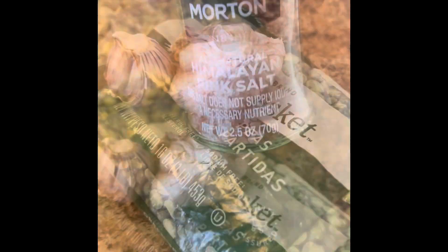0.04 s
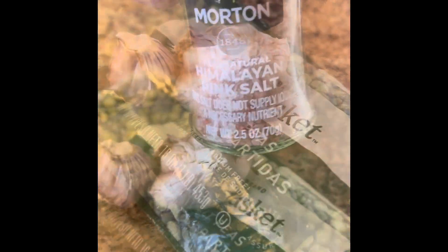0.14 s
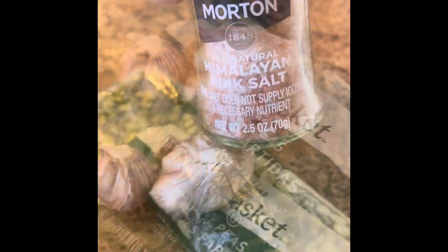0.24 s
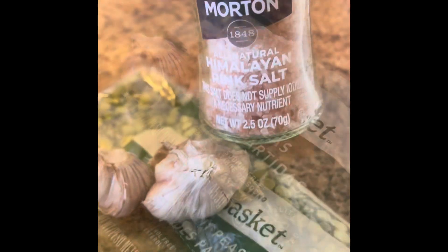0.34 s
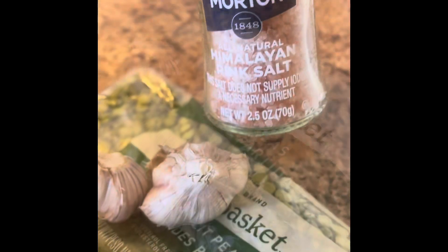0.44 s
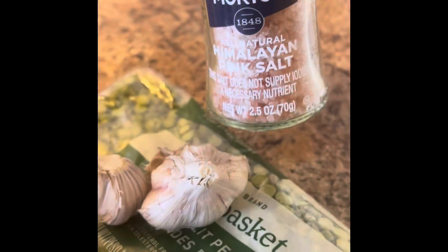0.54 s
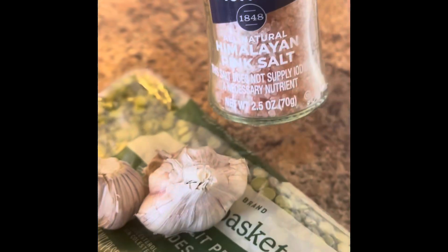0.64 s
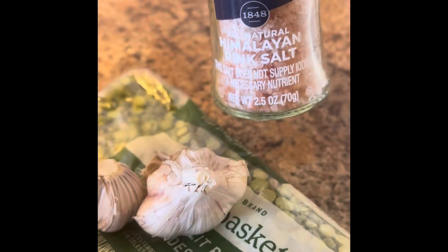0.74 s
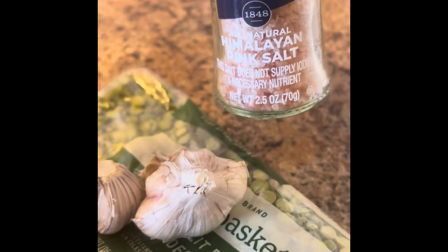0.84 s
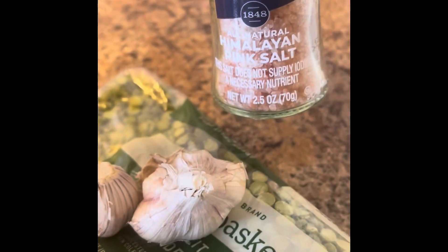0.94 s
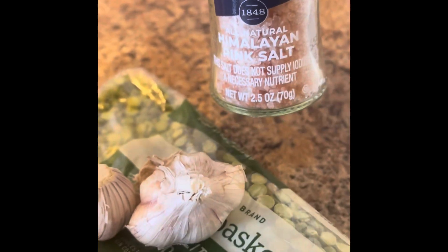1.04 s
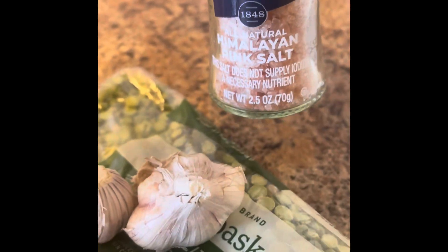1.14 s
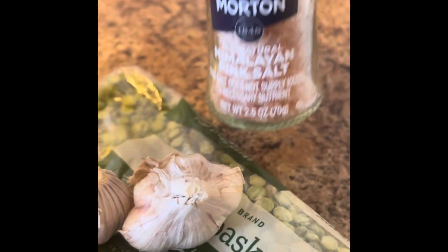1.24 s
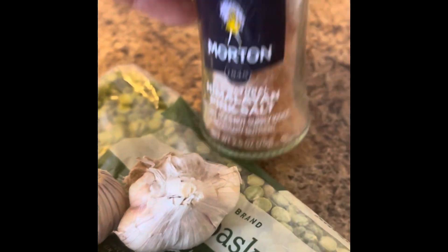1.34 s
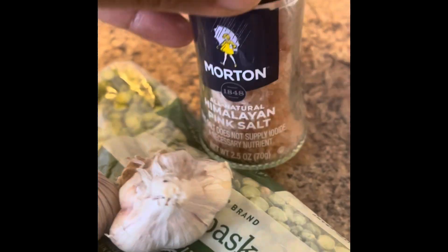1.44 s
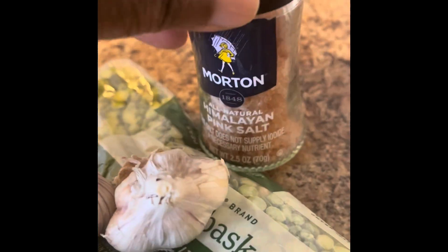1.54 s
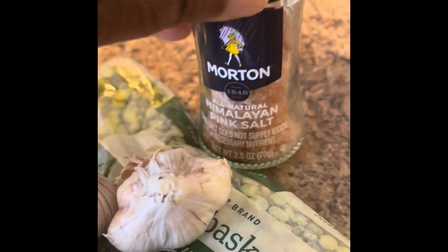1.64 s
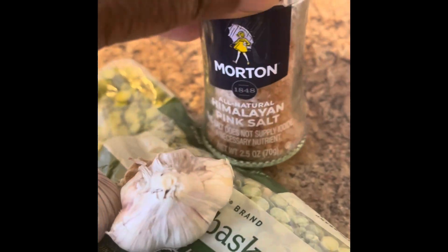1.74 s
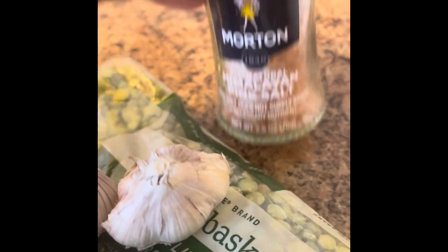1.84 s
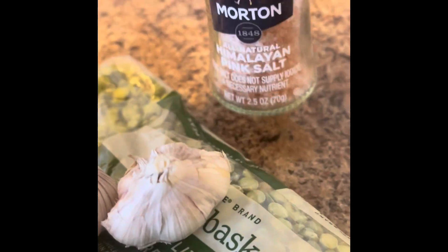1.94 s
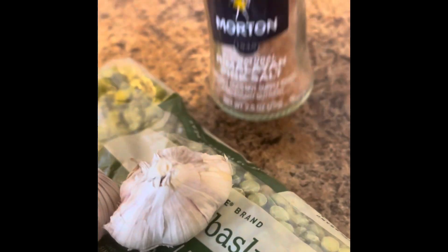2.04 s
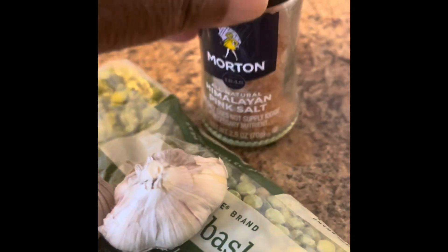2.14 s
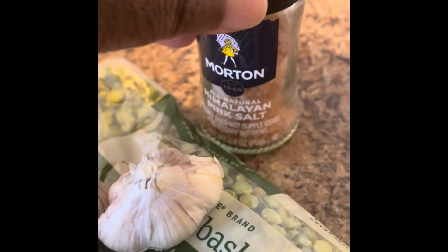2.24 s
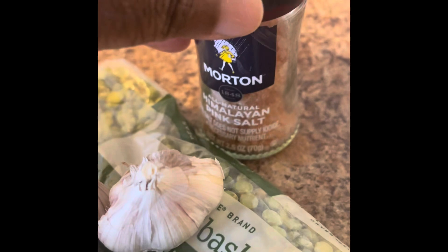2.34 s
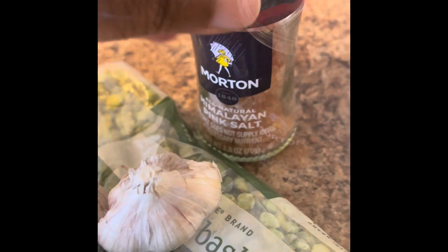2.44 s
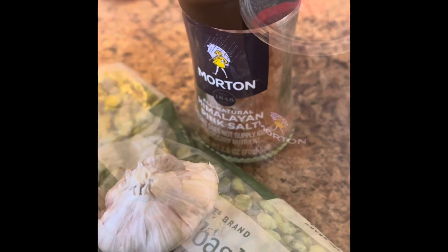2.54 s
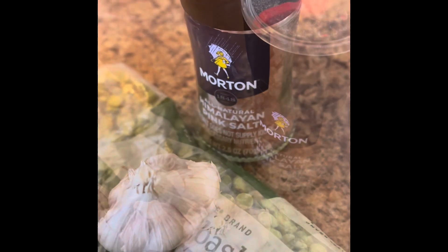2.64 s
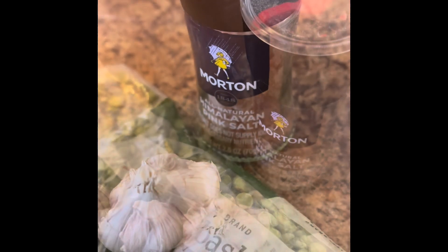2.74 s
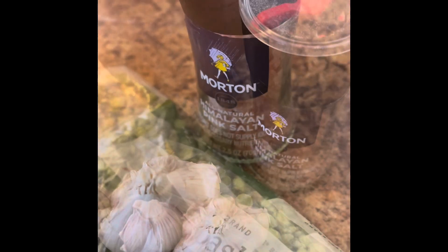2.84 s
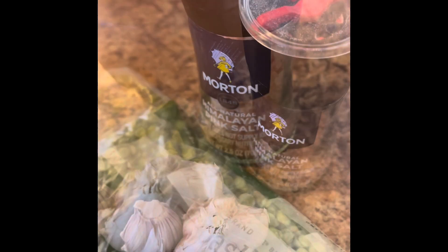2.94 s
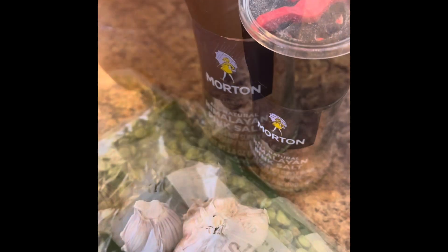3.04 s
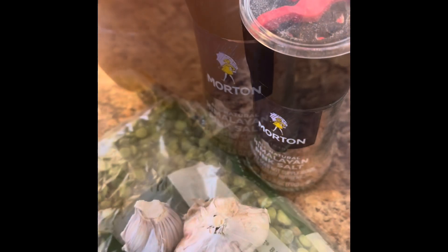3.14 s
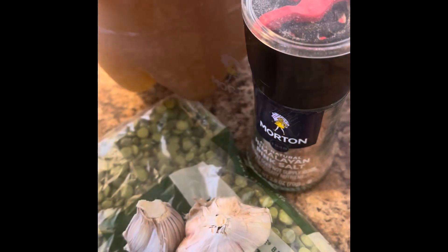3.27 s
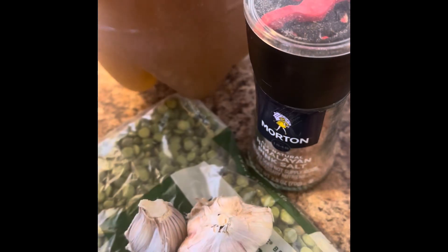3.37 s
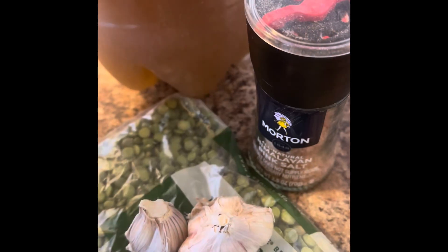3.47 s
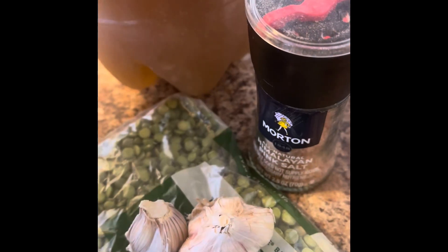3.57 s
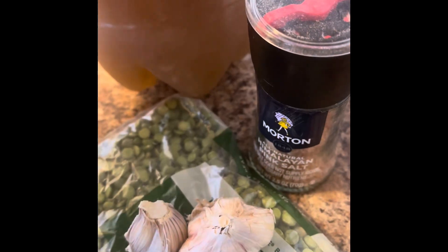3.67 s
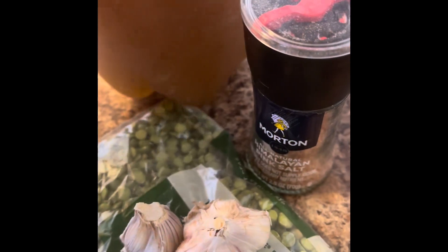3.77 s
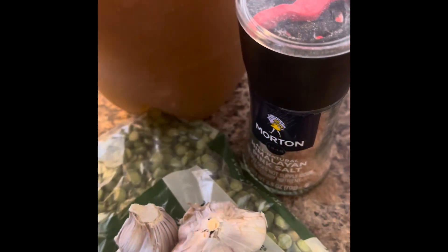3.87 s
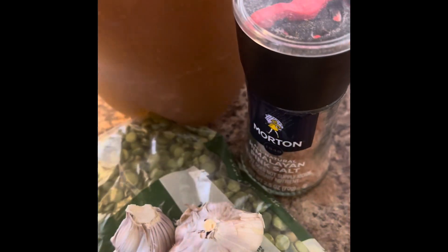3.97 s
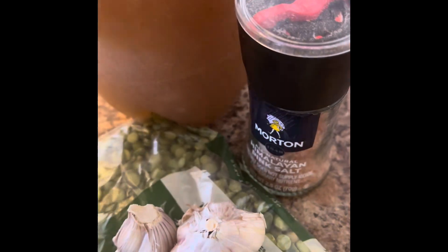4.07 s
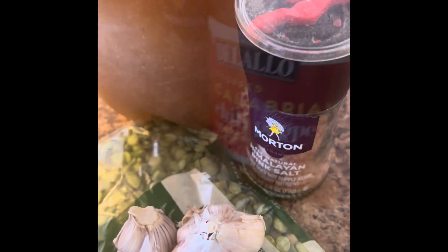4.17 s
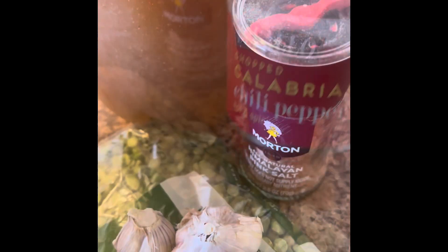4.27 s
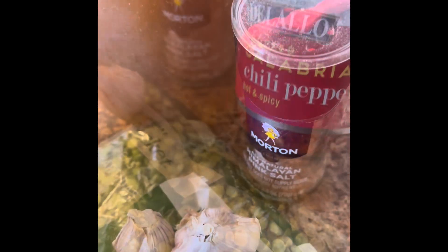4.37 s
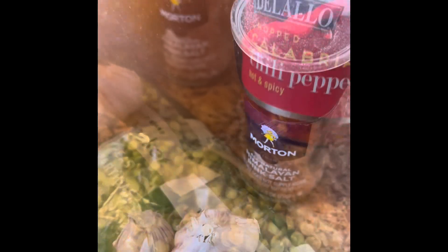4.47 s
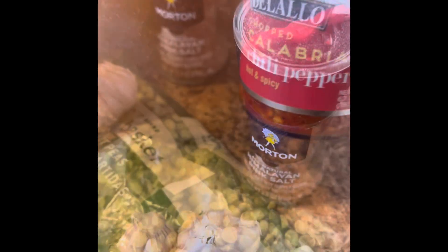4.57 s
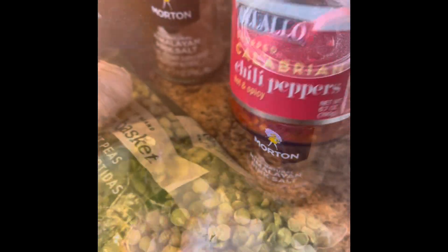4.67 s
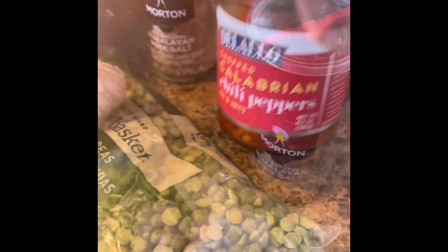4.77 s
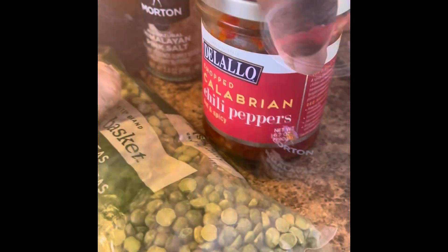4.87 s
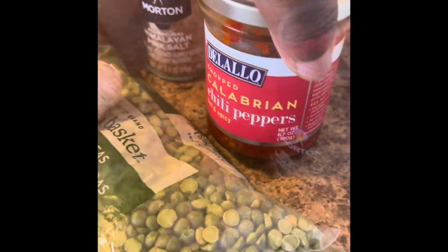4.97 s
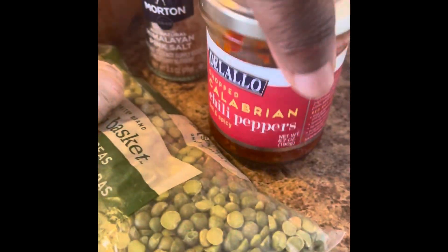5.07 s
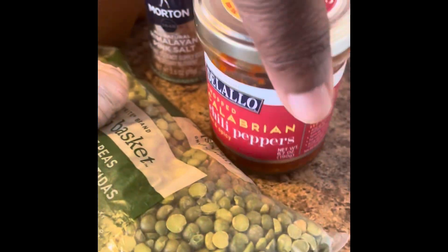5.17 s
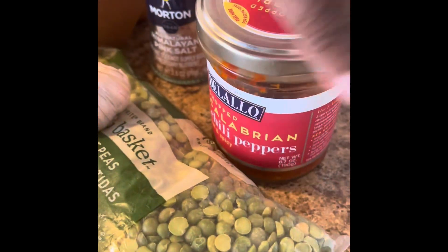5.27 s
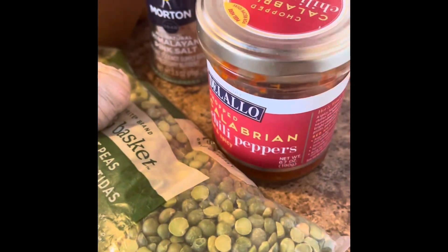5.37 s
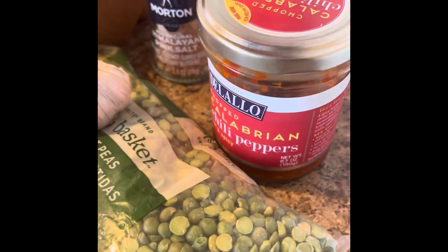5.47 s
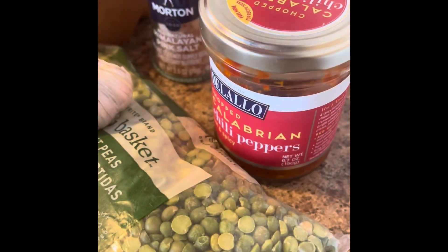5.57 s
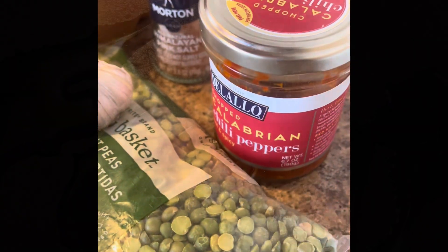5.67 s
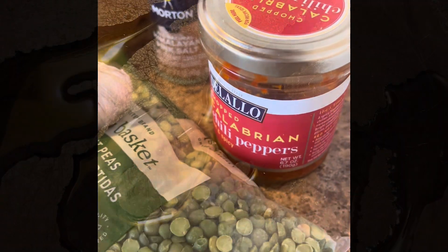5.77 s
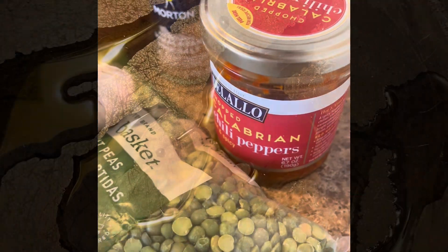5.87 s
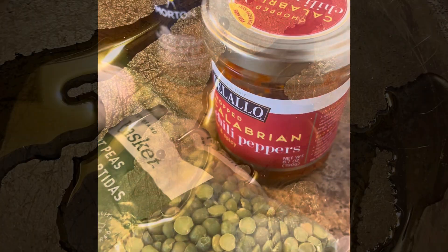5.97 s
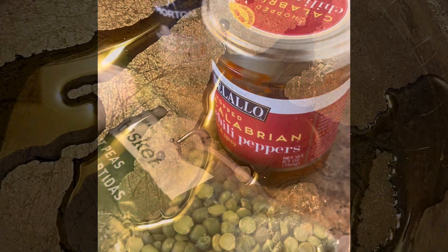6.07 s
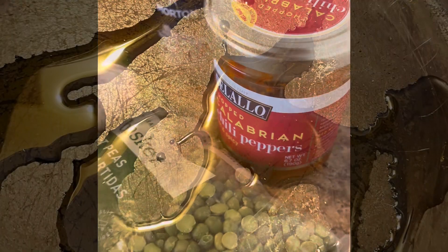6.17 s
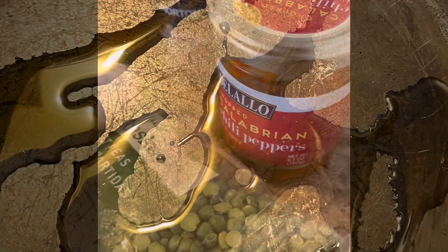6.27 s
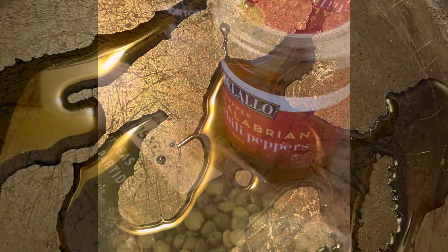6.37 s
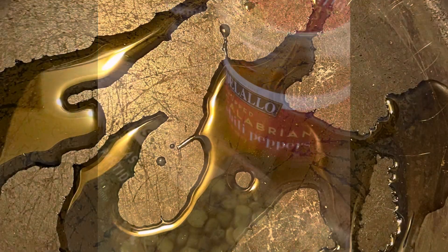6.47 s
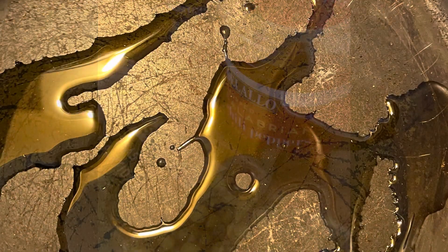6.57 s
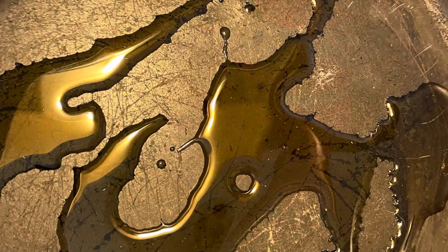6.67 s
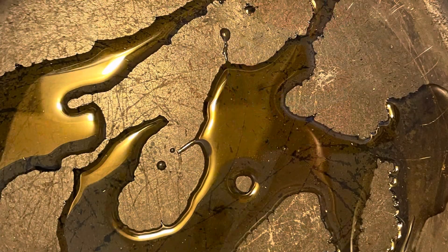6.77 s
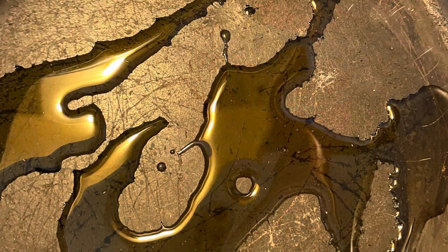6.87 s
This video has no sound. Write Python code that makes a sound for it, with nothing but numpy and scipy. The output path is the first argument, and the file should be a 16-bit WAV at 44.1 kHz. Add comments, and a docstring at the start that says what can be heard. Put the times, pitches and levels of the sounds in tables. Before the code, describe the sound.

Groceries are set down one at a time on a stone counter, close to the microphone, while a refrigerator hums low in the small kitchen. Light plastic crinkling leads to the hard clunk of a glass grinder. Faint packaging taps follow, then a full plastic bottle clacks and thuds with a burst of bag rustle. A glass jar knocks twice as it settles with a brief grating slide, and the hum fades away.

```python
"""Groceries on a stone countertop in a small kitchen, close to a stereo microphone, a refrigerator behind. A
bag of split peas crinkles as it is brushed. A glass salt grinder touches down rim first and lands flat at 2.1
s, ringing on the slab, and its cap taps lightly. At 3.7 s a full plastic bottle thumps down and brushes the
bag. At 4.9 s a glass jar lands, then rocks flat with a brief grating slide. The refrigerator's hum, there from
the start, fades out at the end."""
import sys
import numpy as np
from scipy import signal
from scipy.fft import rfft, irfft, next_fast_len
from scipy.io import wavfile
from scipy.ndimage import map_coordinates

SR = 44100
rng = np.random.default_rng(int(sys.argv[2]) if len(sys.argv) > 2 else 0)


def log_audio(samples):
    """Write samples as a 16-bit WAV file to the path given in sys.argv[1]."""
    # one column per channel
    frames = np.atleast_2d(samples).T
    # limit to full scale, then quantise
    limited = np.clip(frames, -1, 1)
    pcm = np.round(limited * 32767).astype(np.int16)
    wavfile.write(sys.argv[1], SR, pcm)


N = 304510

# the dense high modes of glass and of plastic on stone: (frequency [Hz], spectral level [dB])
GLASS_CLATTER = [(150, -39.5), (500, 7), (900, 3.5), (1500, -3), (2500, -11.5), (4000, -17), (7000, -30),
                 (11000, -24), (13000, -45), (16000, -62)]
PLASTIC_CLATTER = [(200, -25), (800, -0.5), (1800, 2.5), (4000, -1), (6500, -6.5), (8000, -23),
                   (11000, -22), (12500, -38.5), (16000, -60)]


def salt_grinder():
    """The glass grinder meets the stone rim first, then flat, and rings at each contact."""
    # contacts: (time [s], level [dB], brightness [Hz], clatter [dB])
    hits = [(1.6505, -24, 280, -21), (2.0722, .5, 10000, 0), (2.0787, -4, 200, -10)]
    # its ring on the slab: (frequency [Hz], level [dB], t60 [s])
    modes = [(98, -8.6, .13), (141, -13, .12), (204, -5, .125), (309, -27, .1), (425, -3.4, .08),
             (585, -22, .16), (655, -1.5, .06), (806, -16, .14), (975, -19, .07), (1100, -24, .07),
             (1353, -6, .03), (1522, -15, .052), (2265, -28, .05), (2473, -14, .011), (3383, -16, .008)]
    return knocks(hits, modes, GLASS_CLATTER, clatter_db=-18, clatter_t60=0.1, crack_db=-5,
                  lag=0.026, rise_cycles=0.37, skew_rad=0.54)


def glass_jar():
    """The jar lands with a double knock and rocks flat with another."""
    # contacts: (time [s], level [dB], brightness [Hz], clatter [dB])
    hits = [(4.8592, -1, 12000, 5.5), (4.8678, -2.5, 450, -9.5), (5.1206, -8.5, 3000, -20),
            (5.1251, -2.5, 2500, -6)]
    # its ring on the slab: (frequency [Hz], level [dB], t60 [s])
    modes = [(143.2, -20, 0.19), (200.3, -23, 0.12), (282, -30, 0.52), (378.5, -11.5, 0.12),
             (485.5, 0.06, 0.032), (548.7, -6, 0.04), (625, -10, 0.065), (756, -31.5, 0.1),
             (843, -16, 0.069), (1034, -26.5, 0.079), (1193, -29, 0.11), (1667, -11.5, 0.0054),
             (2020, -20.5, 0.011)]
    return knocks(hits, modes, GLASS_CLATTER, clatter_db=-22, clatter_t60=0.076, crack_db=-19,
                  lag=0.028, rise_cycles=0.65, skew_rad=0.2)


def plastic_bottle():
    """The full bottle's hard base clacks on the stone in four quick contacts."""
    # contacts: (time [s], level [dB], brightness [Hz], clatter [dB])
    hits = [(3.6860, -9, 2950, -5.5), (3.7030, -19, 2014, -2.5), (3.7120, -0.5, 7946, 2),
            (3.8098, 1.5, 1100, -23)]
    # its ring on the slab: (frequency [Hz], level [dB], t60 [s])
    modes = [(625.5, -15.5, .04), (836, -12.5, 0.034), (1036, -9, .035), (1192, -17.5, 0.099),
             (1330, -13, 0.045), (1904, -12.5, 0.055), (2040, -15.5, 0.017), (2620, -26, 0.049),
             (3339, -25, 0.065), (3813, -18.5, 0.017), (4100, -18.5, 0.047), (6073, -24.5, .05)]
    return knocks(hits, modes, PLASTIC_CLATTER, clatter_db=-10.5, clatter_t60=.05, crack_db=-13.5,
                  lag=0.024, rise_cycles=1.0, skew_rad=0.93)


def knocks(hits, modes, clatter, clatter_db, clatter_t60, crack_db, lag, rise_cycles, skew_rad):
    """Each contact gives a crack, a short clatter and the object's modes; soft contacts ring duller."""
    out, t = np.zeros((2, N)), np.arange(SR // 2) / SR
    for s, db, bright_hz, rattle_db in hits:
        ring = np.zeros((2, len(t)))
        for k, (hz, mode_db, t60) in enumerate(modes):
            age = np.maximum(t - lag / np.sqrt(hz), 0)  # low bending waves cross the slab more slowly
            swell = 1 - np.exp(-age * hz / rise_cycles)
            decay = amp(mode_db + rng.normal(0, .5) - 60 * age / t60)
            # short waves reach the microphone's two ports out of step
            skew = skew_rad * min(hz / 700, 1, 2500 / hz) * (-1) ** k * np.array([[1], [-1]])
            ring += decay * swell * np.sin(2 * np.pi * hz * age + skew)
        burst = amp(clatter_db - 60 * t / clatter_t60) + amp(crack_db - 60 * t / .006)
        grit = amp(rattle_db) * coloured(burst * near_noise(len(t), width=.2), clatter)
        contact_lowpass = signal.butter(1, np.clip(bright_hz, 50, SR / 3), fs=SR)
        add(out, s, amp(db) * (signal.lfilter(*contact_lowpass, ring) + grit))
    return out


def counter_thuds(rumble_db=-9, focus_db=18, rise_cycles=0.38):
    """Weight settling on the counter swings the modes near its own pace, in a dull rumble."""
    # soft heavy contacts: (time [s], level [dB], favoured frequency [Hz], left over right [dB])
    pushes = [(1.475, -29, 144, 1), (1.653, -27.5, 267, -0.5), (2.081, -14, 130, -5),
              (3.687, -18.5, 284, -8), (3.720, -14, 192, -9), (3.795, -14, 101, -8), (3.8128, -10, 145, -9),
              (3.915, -29.5, 88, -5.5), (4.146, -30.5, 135, -9), (4.863, -12, 172, -0.5)]
    # low modes of the loaded counter: (frequency [Hz], level [dB], t60 [s])
    modes = [(56, -9, .25), (82.4, -6.5, 0.12), (100, 1, 0.22), (137, -1, 0.2), (191, 0, 0.1),
             (275, -2.5, .08)]
    out, t = np.zeros((2, N)), np.arange(SR // 2) / SR
    for s, db, push_hz, pan_db in pushes:
        swing = np.zeros(len(t))
        for hz, mode_db, t60 in modes:
            start_db = db + mode_db - focus_db * np.log2(hz / push_hz) ** 2
            swell = 1 - np.exp(-t * hz / rise_cycles)
            swing += amp(start_db - 60 * t / t60) * swell * np.sin(2 * np.pi * hz * t)
        band = [(push_hz / 6, -45), (push_hz / 3, -25), (push_hz, 0),
                (1.7 * push_hz, -5), (4 * push_hz, -38), (15 * push_hz, -80)]
        rumble = coloured(amp(db + rumble_db - 60 * t / .15) * near_noise(len(t), width=0.13), band)
        add(out, s, (swing + rumble) * amp([[pan_db / 2], [-pan_db / 2]]))
    return out


def bag_snaps(gain_db=-3.5, snap_t60=0.0048, flutter_db=-10, flutter_t60=.04):
    """A crease of the plastic bag buckles with a sharp tick, and the film flutters briefly."""
    # the loudest creases: (time [s], level [dB], low crack [dB], top sparkle [dB])
    snaps = [(0.1072, -43, -17.5, -4.5), (0.2952, -41.5, -16.5, -7), (1.3139, -31.5, 2, -5),
             (1.3263, -29, 3, -1.5), (1.3763, -29, -18, -8.5), (1.4042, -31, -21, -18),
             (1.426, -38, -16, -35), (1.6901, -41.5, -20, -21), (1.806, -45, -6, -17),
             (2.2682, -41, 0, -14), (2.3725, -38.5, -23, -15), (2.9486, -27, -15.5, -17.5),
             (3.7758, -13, -12.5, -17), (3.7899, -14.5, -5, -15), (3.8296, -17.5, -16.5, -17),
             (3.904, -20, -11, -24.5), (3.9144, -22.5, -1.5, -26), (3.9598, -32.5, -28, -5),
             (3.9961, -37, -35, -15), (4.0652, -22.5, -27, -7), (4.125, -30.5, -6.5, -18.5),
             (4.2641, -36, -17, 0.5), (4.3156, -41, -24, -2), (5.7693, -46.5, -27, -3)]
    out, t = np.zeros((2, N)), np.arange(SR // 8) / SR
    decay = amp(-60 * t / snap_t60) + amp(flutter_db - 60 * t / flutter_t60)
    for s, db, low_db, top_db in snaps:
        tick = decay * near_noise(len(t), width=0.19)
        colour = [(400, low_db - 30), (1500, low_db), (3000, low_db - 0.5), (6500, -13),
                  (11000, top_db + 5.5), (13500, top_db - 10), (16000, top_db - 25)]
        add(out, s, amp(db + gain_db) * coloured(tick, colour))
    return out


def bag_rustle(press_s=.016, relax_s=.04, sag_db=6.5, arch_db=9.5, crease_db=-5):
    """A brush crumples the bag hardest at first, fizzes most halfway and pops creases at random."""
    # touches on the bag: (start [s], length [s], crumple [dB], fizz [dB])
    brushes = [(0.076, 0.34, -100, -68), (1.315, .165, -49, -56.5), (1.592, 0.119, -66.5, -73),
               (1.723, 0.061, -59, -60.5), (2.21, .21, -64.5, -67.5), (3.72, 0.067, -40.5, -52),
               (3.785, 0.12, -38.5, -42.5), (3.94, 0.17, -65, -56.5), (4.103, 0.16, -66.5, -84)]
    # the film's coarse crumple and fine fizz: (frequency [Hz], spectral level [dB])
    crumple_spectrum = [(500, -29.5), (1050, -3), (1700, -0.5), (2800, 0), (5000, -6), (7500, -7.5),
                        (10000, -10), (13000, -27.5)]
    fizz_spectrum = [(2000, -28), (5000, -9.5), (8000, -5.5), (11000, 5), (12500, -10), (14500, -18),
                     (16500, -34)]
    t, crumple_gain, fizz_gain = np.arange(N) / SR, np.zeros(N), np.zeros(N)
    for s, length, crumple_db, fizz_db in brushes:
        progress = np.clip((t - s) / length, 0, 1)
        touch_db = -20 * (np.maximum(s - t, 0) / press_s + np.maximum(t - s - length, 0) / relax_s)
        crumple_gain += amp(crumple_db + touch_db - sag_db * progress)
        fizz_gain += amp(fizz_db + touch_db - arch_db * (2 * progress - 1) ** 2)
    crumple = crinkle(rate=2200, spread_db=4, clump_db=2.5, spectrum=crumple_spectrum)
    creases = crinkle(rate=90, spread_db=2, clump_db=1, spectrum=crumple_spectrum)
    fizz = crinkle(rate=12000, spread_db=0.5, clump_db=4.5, spectrum=fizz_spectrum)
    return crumple_gain * (crumple + amp(crease_db) * creases) + fizz_gain * fizz


def glass_slide():
    """A glass base grates over the stone as it settles, swelling and dying with the pressure."""
    # slides: (time of hardest pressure [s], level [dB], time to rise or fall by 20 dB [s])
    slides = [(2.070, -25, .013), (5.122, -29, .014), (5.2, -45, .045)]
    # glass grating on stone: (frequency [Hz], spectral level [dB])
    grate = [(250, -16.5), (500, -1), (800, 0), (1300, -12.5), (2500, -20), (4000, -26), (6500, -35.5),
             (11000, -45.5), (14000, -71)]
    t = np.arange(N) / SR
    pressure = sum(amp(db - 20 * np.abs(t - s) / ramp_s) for s, db, ramp_s in slides)
    return pressure * crinkle(rate=5000, spread_db=2, clump_db=-0.5, spectrum=grate)


def grinder_cap_taps():
    """The salt grinder's cap is tapped lightly and gives short, high clicks."""
    # contacts: (time [s], level [dB], brightness [Hz], clatter [dB])
    hits = [(1.5755, -51.5, 5030, 3), (1.5945, -49, 5000, 0), (2.5915, -44, 2500, -5.5),
            (2.9485, -32, 10000, -13), (1.6500, -39.5, 1540, 7.5), (3.0830, -43.5, 2990, -10),
            (3.3145, -47, 5970, 7), (4.0725, -29, 603, -16)]
    # the cap's ring: (frequency [Hz], level [dB], t60 [s])
    modes = [(1179, -9, 0.029), (1622, -20.5, 0.05), (2091, -7.5, 0.039), (2483, -0.5, 0.015),
             (3290, -8, 0.023)]
    return knocks(hits, modes, PLASTIC_CLATTER, clatter_db=-15, clatter_t60=0.022, crack_db=-58,
                  lag=0.0079, rise_cycles=.5, skew_rad=0.35)


def fridge(drone_hz=57.7, rush_db=-1, tones_db=1, drone_gain_db=-2, fade_end_s=6.659, fade_s=0.71):
    """The room tone: a deep drone and wavering motor tones in a low rush, with faint air hiss above."""
    # the background's course: (time [s], hum [dB], hiss [dB], drone [dB])
    levels = [(0, -50.5, -71.5, -55), (.5, -58.5, -83.5, -71), (1.88, -57, -80.5, -73.5),
              (2.2, -42, -65.5, -68), (2.75, -50, -70, -51.5), (3.25, -50.5, -71, -52),
              (3.65, -48, -68.5, -47.5), (4.7, -49, -70, -53), (5.3, -42, -66.5, -49.5),
              (5.8, -45.5, -64.5, -51.5), (6.2, -47.5, -68.5, -55)]
    # the hum leans right for a while: (time [s], left over right [dB])
    lean = [(2.65, -0.46), (3.2, -9), (4.35, -8.5), (4.72, -0.9)]
    # motor tones: (frequency [Hz], relative level [dB])
    motor = [(100, -13.5), (141, -10.5), (186, -8), (203, -12), (414.5, -17.5), (888, -28.5), (1184, -29.5),
             (2444, -43.5), (3500, -47), (4350, -46)]
    # the low rush and the air hiss: (frequency [Hz], spectral level [dB])
    rush_spectrum = [(20, -38), (35, -19.5), (55, -8), (78, -12), (102, -3), (151, -10), (193, 4),
                     (256, -12.5), (346, -4.5), (420, -11.5), (700, -24), (870, -23), (1210, -33.5),
                     (1600, -46), (2600, -87.5)]
    hiss_spectrum = [(700, -19.5), (1200, -7), (1800, -10.5), (2350, -14), (2900, -22.5), (4700, -22.5),
                     (6700, -23), (8500, -27.5), (9600, -22), (10900, -21.5), (12500, -39.5),
                     (16000, -60.5)]
    hum_db, hiss_db, drone_db = curves(levels)
    pan_db, = curves(lean)
    t, tones = np.arange(N) / SR, np.zeros(N)
    for hz, db in motor:
        tones += np.sqrt(2) * amp(db + 2 * wobble(5.5)) * np.sin(2 * np.pi * hz * t + 0.77 * wobble(4.6))
    drone_peak = np.sqrt(2) * amp(drone_db + drone_gain_db + 3.2 * wobble(9))
    drone = drone_peak * np.sin(2 * np.pi * drone_hz * t + 0.99 * wobble(17))
    hum = amp(hum_db) * (amp(rush_db) * diffuse_noise(rush_spectrum) + amp(tones_db) * tones) + drone
    hiss = amp(hiss_db) * diffuse_noise(hiss_spectrum)
    fade = np.clip((fade_end_s - t) / fade_s, 0, 1)
    return fade * (hum * amp([pan_db / 2, -pan_db / 2]) + hiss)


def room(x, gap_s=.006):
    """The kitchen's diffuse answer, each frequency dying at its own speed."""
    # reverberation: (frequency [Hz], t60 [s])
    decay_times = [(100, 0.5), (400, 0.54), (1500, 0.35), (5000, 0.26), (12000, .3)]
    hz, t, noise = signal.stft(spread(rng.standard_normal((2, SR // 2))), SR, nperseg=256)
    decay = amp(-60 * t / along(decay_times, hz)[:, None])
    _, tail = signal.istft(noise * decay, SR, nperseg=256)
    delayed = np.pad(x.mean(axis=0), (round(gap_s * SR), 0))
    return signal.fftconvolve(delayed[None], tail / np.linalg.norm(tail[0]), axes=1)[:, :N]


def spread(pair):
    """Two unrelated signals become a diffuse field: mono in the bass, widest in the middle range."""
    # the room at the microphone: (frequency [Hz], left-right correlation [0..1])
    likeness = [(60, 1), (140, 1), (300, 0.98), (640, 0.31), (1400, 0.084), (3000, .45), (5000, 0.33),
                (12000, 1)]
    turn = lambda hz: np.arccos(np.clip(along(likeness, hz), -1, 1)) / 2
    mid, side = filtered(pair, lambda hz: np.array([np.cos(turn(hz)), np.sin(turn(hz))]))
    return np.array([mid + side, mid - side])


def diffuse_noise(spectrum):
    """Noise from all round the room, with the given spectrum."""
    field = spread(rng.standard_normal((2, N)))
    return unit(filtered(field, lambda hz: amp(along(spectrum, hz))))


def near_noise(n, width):
    """Noise from close to the microphone, nearly alike in both channels."""
    mid, side = rng.standard_normal((2, n))
    return unit(np.array([mid + width * side, mid - width * side]))


def crinkle(rate, spread_db, clump_db, spectrum):
    """Tiny clicks of unequal size, about rate a second, swelling in clumps."""
    clicks = rng.random(N) < rate / SR
    size_db = spread_db * np.clip(rng.standard_normal(N), -2, 2) + clump_db * wobble(170)
    return unit(coloured(clicks * amp(size_db) * near_noise(N, width=0.051), spectrum))


def amp(db):
    """Decibels to gain."""
    return 10 ** (np.asarray(db) / 20)


def unit(x):
    """Scaled to rms 1."""
    return x / np.sqrt(np.mean(x ** 2) + 1e-20)


def along(points, hz):
    """(frequency [Hz], value) points read on a log axis."""
    freqs, values = np.transpose(points)
    return np.interp(np.log(hz + 1), np.log(freqs + 1), values)


def curves(rows):
    """One value per sample for each column after the time."""
    times, *columns = np.transpose(rows)
    return [np.interp(np.arange(N) / SR, times, column) for column in columns]


def wobble(rate):
    """A smooth random curve, rate knots a second."""
    knots = rng.standard_normal(int(N * rate / SR) + 4)
    return map_coordinates(knots, [np.arange(N) * rate / SR])


def filtered(x, response):
    """x times a complex response of frequency."""
    n = x.shape[-1]
    size = next_fast_len(n + 8192)
    return irfft(rfft(x, size) * response(np.fft.rfftfreq(size, 1 / SR)), size)[..., :n]


def coloured(x, spectrum, size=2048):
    """x through a minimum-phase filter of unit energy with the given spectrum."""
    cepstrum = irfft(np.log(amp(along(spectrum, np.fft.rfftfreq(size, 1 / SR)))))
    cepstrum[1:size // 2] *= 2
    cepstrum[size // 2 + 1:] = 0
    kernel = irfft(np.exp(rfft(cepstrum)))
    return signal.fftconvolve(x, kernel[None] / np.linalg.norm(kernel), axes=1)[:, :x.shape[1]]


def add(track, s, sound):
    """Mix a sound into the track at time s."""
    part = track[:, max(round(s * SR), 0):][:, :sound.shape[-1]]
    part += sound[..., :part.shape[1]]


def scene():
    """The counter up close, with the kitchen's reverberation and the refrigerator behind it."""
    # glass throws more of its treble into the room: (frequency [Hz], gain [dB])
    glass_throw = [(150, 0), (500, -1.5), (1200, 2.5), (2000, 4.5), (6000, 7.5)]
    grinder, jar, bottle, taps = salt_grinder(), glass_jar(), plastic_bottle(), grinder_cap_taps()
    bag = bag_snaps() + bag_rustle()
    glass = grinder + jar + glass_slide()
    thuds = counter_thuds()
    thrown = filtered(glass, lambda hz: amp(along(glass_throw, hz)))
    reverb = amp(-20.5) * room(thrown) + amp(-15) * room(bottle + thuds) + amp(-13) * room(bag + taps)
    return glass + bottle + taps + bag + thuds + reverb + fridge()


def record(dry, ceiling=.95, top_hz=16500):
    """The microphone's two ports differ in phase; peaks are rounded and both ends of the band fall off."""
    # phase between the ports: (frequency [Hz], left lead [rad])
    port_phase = [(100, 0), (2200, .1), (4100, .7), (4850, 3.1), (5700, 6), (7000, 7), (9200, 9.4),
                  (11500, 12.2), (16000, 12.8)]
    # microphone response: (frequency [Hz], gain [dB])
    response = [(20, -15.5), (38, -8.5), (58, 0), (11500, -0.5), (13000, -8), (15000, -8.5)]
    ported = filtered(dry, lambda hz: np.exp(.5j * along(port_phase, hz) * np.array([[1], [-1]])))
    rounded = ported / (1 + np.abs(ported / ceiling) ** 6) ** (1 / 6)
    return filtered(rounded, lambda hz: amp(along(response, hz)) * (hz < top_hz))


dry = scene()
out = record(dry)
log_audio(out)
```